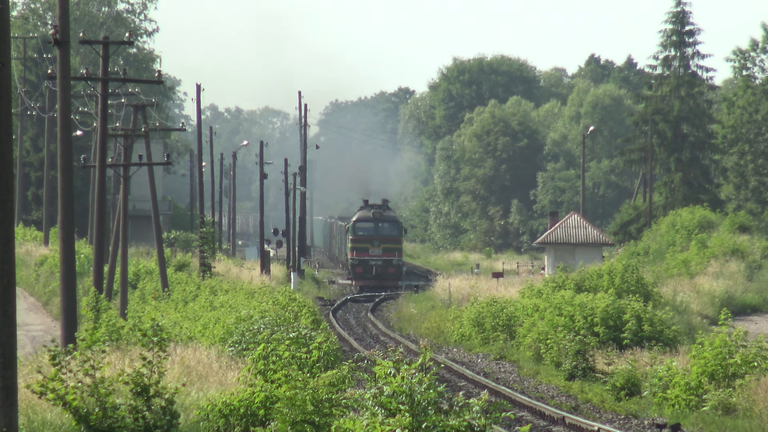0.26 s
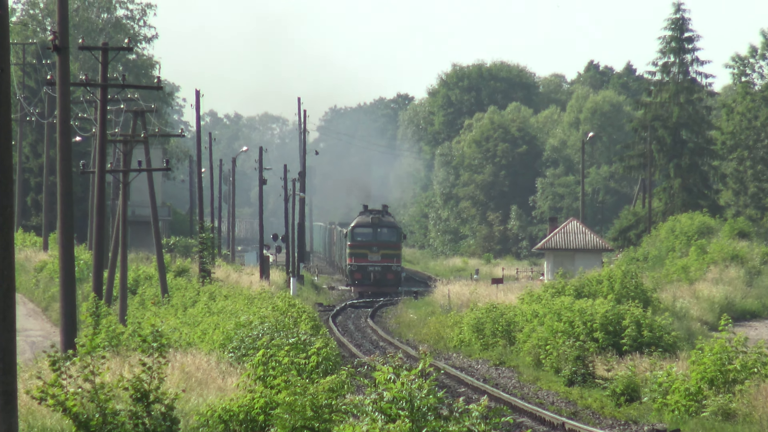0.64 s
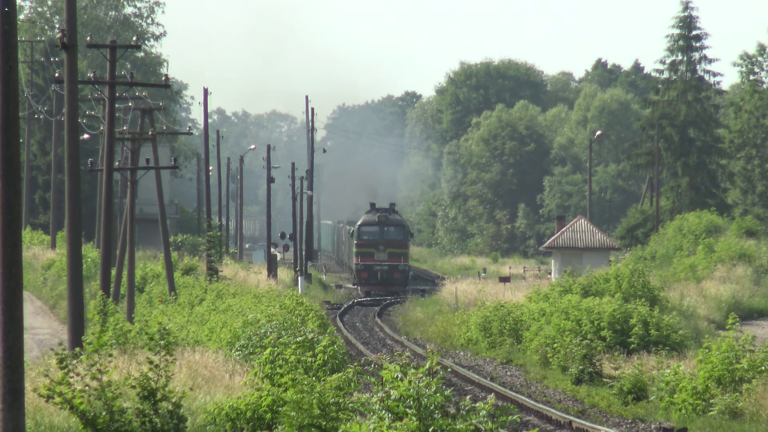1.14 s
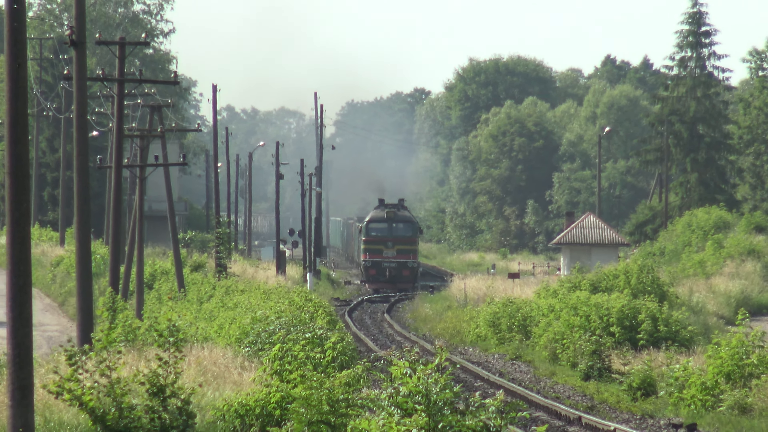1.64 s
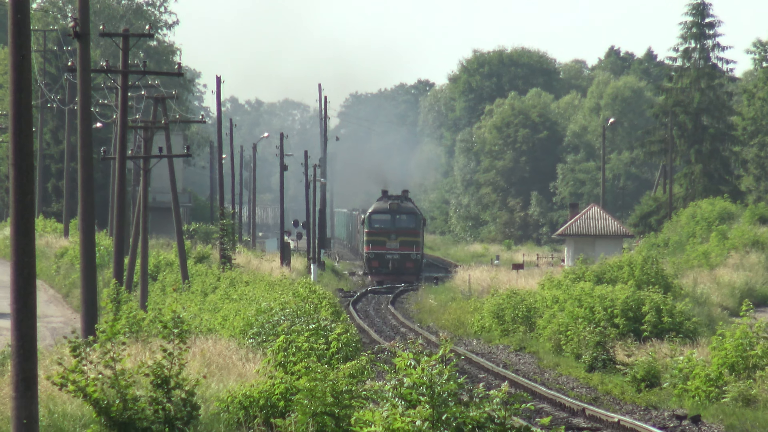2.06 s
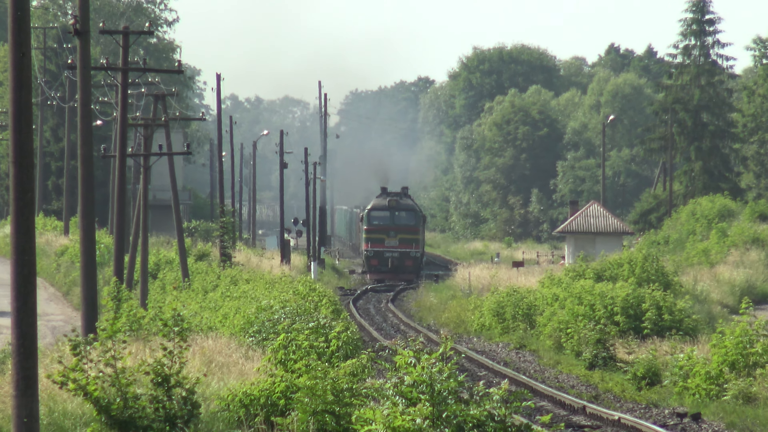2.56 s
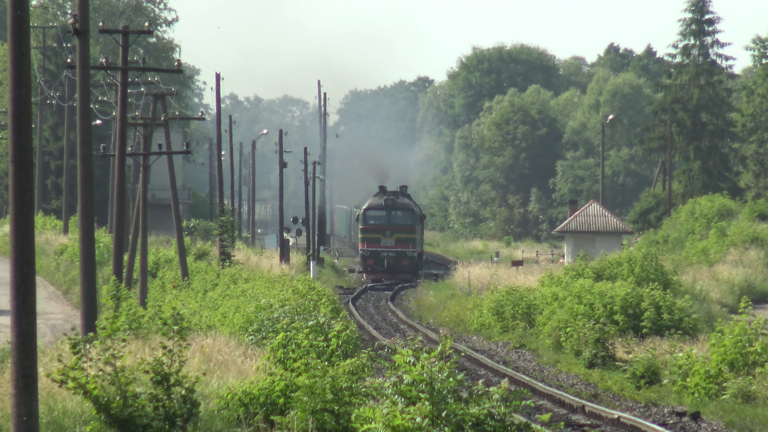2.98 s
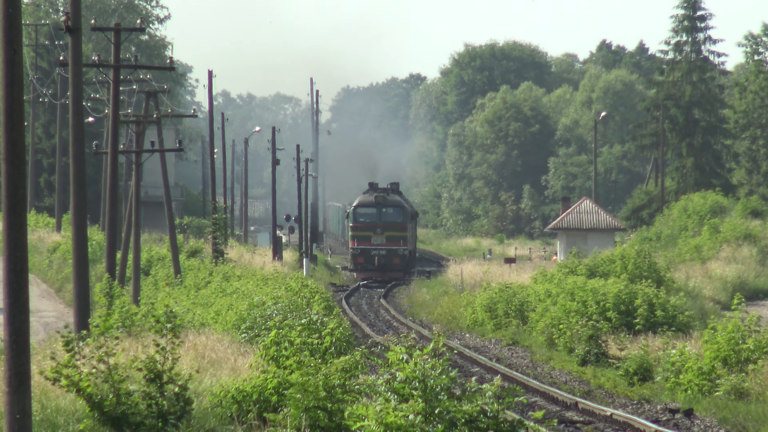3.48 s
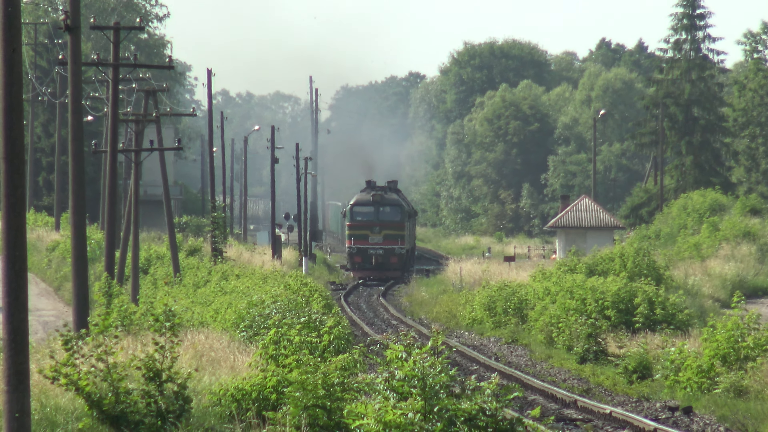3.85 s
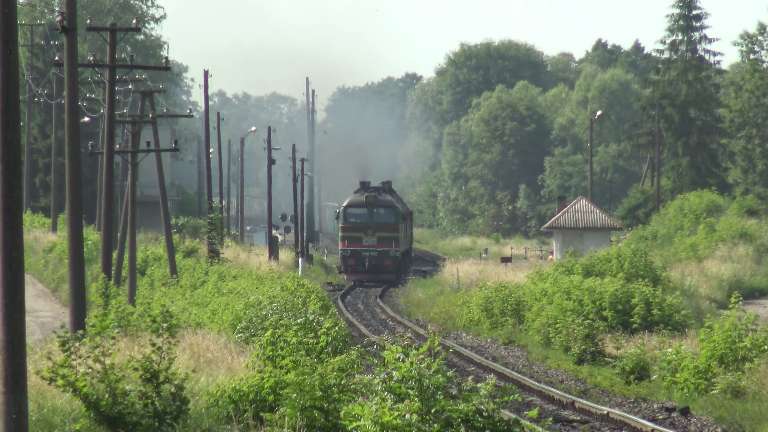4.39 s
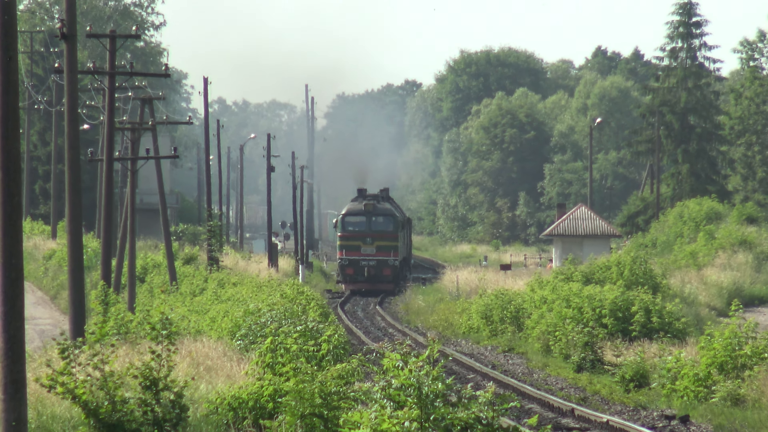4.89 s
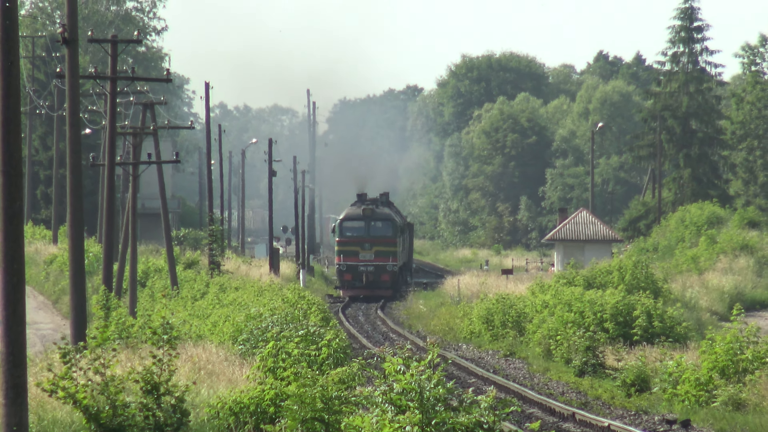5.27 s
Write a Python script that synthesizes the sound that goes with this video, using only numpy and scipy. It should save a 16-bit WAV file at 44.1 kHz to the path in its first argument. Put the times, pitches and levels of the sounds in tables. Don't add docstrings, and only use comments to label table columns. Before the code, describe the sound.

Outdoors by a wooded railway, a far-off twin diesel drones continuously, very low and uneven in strength, growing slightly fuller in the last part. Muffled exhaust roar and a thin hiss sit over it. Small birds give brief chirps and whistles, busiest near the end, leaves rustle faintly, and gusts gently rumble at the microphone.

```python
import sys
import numpy as np
from scipy import signal
from scipy.io import wavfile
from scipy.ndimage import uniform_filter1d, map_coordinates

SR = 44100
rng = np.random.default_rng(int(sys.argv[2]) if len(sys.argv) > 2 else 0)


def to_linear_factor(level_db):
    exponent = np.asarray(level_db, float) / 20
    return 10 ** exponent


def to_wav(s):
    ch = np.atleast_2d(s).T
    pcm = np.round(np.clip(ch, -1, 1) * 32767)
    wavfile.write(sys.argv[1], SR, pcm.astype(np.int16))


N = 243961
T = np.arange(N) / SR
FRONT_HZ, REAR_HZ = 10.781, 11.05
FIRINGS_PER_TURN = 6


def evened(x):
    return x / np.sqrt(np.mean(x ** 2) + 1e-20)


def curve(rows):
    s, db = np.transpose(rows)
    return np.interp(T, s, db)


def bumps(rows, width_s):
    return sum(db * np.exp(-((T - s) / width_s) ** 2) for s, db in rows)


def wander(top_hz):
    count = int(N / SR * top_hz * 2) + 4
    places = np.linspace(1, count - 2, N)
    return evened(map_coordinates(rng.standard_normal(count), [places], order=3))


def add(mix, s, sound):
    part = mix[round(s * SR):][:len(sound)]
    part += sound[:len(part)]


def noise(points, patchy_db, size):
    frames, hz = 4 * N // size + 5, np.fft.rfftfreq(size, 1 / SR)
    real, imaginary, patches = rng.standard_normal((frames, len(hz), 3)).T
    for axis in (0, 1):
        patches = uniform_filter1d(patches, size=8, axis=axis)
    patches = evened(patches)
    f, db = np.transpose(points)
    shape_db = np.interp(np.log(hz + 1), np.log(f + 1), db, left=-90, right=-90)
    z = (real + 1j * imaginary) * to_linear_factor(shape_db[:, None] + patchy_db * patches)
    sound = signal.istft(z, nperseg=size, noverlap=3 * size // 4)[1]
    return evened(sound[:N])


# (time [s], level [dB])
FRONT_FIRING = [(0.0, -14.5), (0.43, -13.0), (0.49, -6.5), (0.77, -8.5), (1.05, -7), (1.78, -12.5),
                (1.85, -7.5), (2.21, -7), (2.44, -11.5), (2.7, -11.5), (2.92, -6.5), (3.02, -9.7),
                (3.62, -9.0), (4.04, -10.6), (4.46, -7), (4.48, -8), (5.3, -8.8), (5.53, -7.5)]
# (time [s], level [dB])
HUM_EDDIES = [(.07, 4.5), (.19, -1.5), (.28, 4.5), (.98, -2), (2.47, -1), (2.56, 2), (3.04, -1.5),
              (3.13, 3.5), (3.4, -3), (3.7, 2), (4.01, -2.5), (4.73, -2), (4.85, 2.5), (5.3, -1), (5.4, 4)]


def hum():
    in_step_s = .0682
    sway = .035 * wander(2.5)
    turns = FIRINGS_PER_TURN * (T - in_step_s)
    front = np.cos(2 * np.pi * (FRONT_HZ * turns + sway))
    rear = np.cos(2 * np.pi * (REAR_HZ * turns + sway))
    both = to_linear_factor(curve(FRONT_FIRING)) * front + to_linear_factor(-23.5) * rear
    return np.sqrt(2) * to_linear_factor(bumps(HUM_EDDIES, width_s=0.026)) * both


# (time [s], level [dB])
AIR_CARRY = [
    (0, 0),
    (.9, -0.2),
    (1.9, -1),
    (2.7, 1),
    (3.6, -0.76),
    (4.3, 2.5),
    (4.85, 2),
    (5.53, 2.5),
]


def carry(share):
    return to_linear_factor(share * curve(AIR_CARRY))


def orders(crank_hz, rows, waver_db):
    out = np.zeros(N)
    for order, db in rows:
        turn = order * crank_hz * T + rng.random()
        out += to_linear_factor(db + waver_db * wander(1.5)) * np.cos(2 * np.pi * turn)
    return np.sqrt(2) * out


# (order [per crank turn], level [dB])
FRONT_ORDERS = [(4, -38.5), (5, -34.5), (7, -38.5), (8, -40), (9, -39.5), (10, -50), (12, -56), (15, -55.5),
                (16, -50.5), (17, -47.5), (18, -47), (20, -42.5), (21, -46), (22, -49), (23, -42.5),
                (24, -42.5), (25, -50.5), (26, -40.5), (27, -53.5), (28, -55), (29, -37), (30, -42.5),
                (31, -49), (32, -44), (35, -50.5), (37, -57.5), (38, -46), (42, -58), (44, -55.5),
                (47, -55.5)]
REAR_ORDERS = [(3.94, -45.5), (5.2, -47), (8.1, -46.5), (9.005, -47), (11.8, -53.5), (18.03, -47.5),
               (17.37, -53), (21.33, -57.5), (36.44, -56), (40.76, -56), (44, -55)]
# (frequency [Hz], density [dB per Hz])
BODY_SPECTRUM = [(25, -31.5), (40, -5), (55, -2.5), (63, 2), (75, -10), (100, -12.5), (150, -19),
                 (190, -10), (260, -19), (310, -14), (420, -18.5), (600, -36.5)]


def engines():
    tones = orders(FRONT_HZ, FRONT_ORDERS, waver_db=1.5) + orders(REAR_HZ, REAR_ORDERS, waver_db=3.5)
    puff = 1 + 0.19 * np.cos(2 * np.pi * FRONT_HZ * T)
    body = to_linear_factor(-31.5) * noise(BODY_SPECTRUM, patchy_db=3.8, size=8192) * puff
    return (tones + body) * carry(0.67)


def puffs():
    firing = np.cos(2 * np.pi * FIRINGS_PER_TURN * FRONT_HZ * T)
    return firing + 0.2 * np.cos(2 * np.pi * FRONT_HZ * T)


# (frequency [Hz], density [dB per Hz])
ROAR_SPECTRUM = [(300, -26), (450, -1), (700, -3), (1000, -7.5), (1320, -11), (1650, -10), (1850, -11.5),
                 (1960, -13), (2120, -12), (2480, -18), (2650, -16.5), (2850, -23), (3300, -31)]


def exhaust_roar():
    roar = to_linear_factor(-38) * noise(ROAR_SPECTRUM, patchy_db=.6, size=1024)
    return roar * carry(0.41) * (1 + .01 * puffs())


# (frequency [Hz], density [dB per Hz])
HISS_SPECTRUM = [(2300, -15.5), (3050, -1), (3600, -2), (4200, -3), (4550, -5.5), (4690, -4), (4750, -4),
                 (4800, -8), (5200, -14), (5800, -20.5), (6500, -25), (7500, -33.5)]
# (time [s], level over the hiss [dB])
LEAF_RUSTLES = [
    (1.08, 2),
    (2.6, 1.5),
    (3.25, 0.5),
    (4.82, 4),
]


def hiss():
    level = to_linear_factor(-52.5 + bumps(LEAF_RUSTLES, width_s=0.18)) * carry(0.59)
    return level * noise(HISS_SPECTRUM, patchy_db=1.13, size=1024) * (1 + 0.09 * puffs())


# (frequency [Hz], density [dB per Hz])
RUMBLE_SPECTRUM = [(5, -32), (10, -6), (14, 6.5), (22, -16.5), (35, -13.5), (45, -37.5)]


def air_rumble():
    gusts_db = -27.5 + 3.5 * wander(3.0)
    return to_linear_factor(gusts_db) * noise(RUMBLE_SPECTRUM, patchy_db=0.3, size=16384)


# (time [s], length [s], pitch [Hz], glide [Hz], level [dB])
WHISTLE_NOTES = [(0.015, .033, 3000, -20, -55), (.42, .03, 3150, -300, -53),
                 (0.851, .135, 3050, -59.5, -56), (1.165, 0.026, 3340, 200, -50.5),
                 (4.847, 0.019, 3080, -400, -56), (4.873, .03, 2990, -400, -58),
                 (4.9, 0.068, 3140, 125, -56), (4.955, .05, 3150, -220, -51),
                 (4.996, 0.082, 2720, 104, -53), (5.066, .055, 3400, -370, -53.5),
                 (5.28, .03, 2940, 63.5, -54), (5.468, .025, 2730, 380, -53),
                 (5.488, 0.041, 3120, -370, -51)]


def whistles():
    return [(s, length, hz, hz + glide, db, 35) for s, length, hz, glide, db in WHISTLE_NOTES]


# (time [s], length [s], pitch [Hz], glide [Hz], level [dB])
CHIRP_NOTES = [(.07, .05, 4090, -1, -66), (.37, 0.034, 3870, 83, -55), (.715, 0.032, 3900, -49, -54),
               (.775, 0.021, 4620, -320, -53.5), (.782, .041, 3840, 452, -55),
               (1.085, 0.052, 4130, 105, -51.5), (1.115, 0.022, 4700, -1000, -55),
               (1.70, 0.036, 3900, -31.5, -58), (2.465, 0.036, 4390, -85, -49.5),
               (2.803, .04, 4100, 101, -60), (1.17, .02, 3500, 902, -55.5), (3.36, .036, 3990, 61, -56)]


def chirps():
    return [(s, length, hz, hz + glide, db, 70) for s, length, hz, glide, db in CHIRP_NOTES]


# (time [s], pitch [Hz], level [dB])
CHIP_NOTES = [(.225, 4500, -56), (.70, 4720, -58), (2.055, 5250, -65), (2.18, 5200, -61),
              (2.40, 4000, -53.5), (3.16, 5400, -64), (3.185, 3950, -55), (3.285, 5500, -63.5),
              (3.29, 6600, -74), (4.165, 5550, -67), (4.38, 4520, -55), (4.585, 4600, -59),
              (4.80, 4200, -57), (4.82, 3700, -59), (4.72, 3400, -60)]


def chips():
    return [(s, .03, hz, hz * (1 - .06), db, 260) for s, hz, db in CHIP_NOTES]


# (time [s], length [s], pitch [Hz], level [dB])
SEEP_NOTES = [
    (1.553, .07, 7400, -76),
    (3.50, .14, 7300, -79),
    (3.56, .09, 7670, -75.5),
    (5.13, .1, 7450, -73),
    (5.19, .12, 7150, -75.5),
    (5.19, .05, 7700, -76),
]


def seeps():
    return [(s, length, hz, hz, db, 180) for s, length, hz, db in SEEP_NOTES]


def twitter(count):
    s, pitch, glide, size = rng.random((count, 4)).T
    start_s, length = s * (N / SR - .05), .015 + .025 * size
    hz = 2700 * 2 ** (.8 * pitch)
    end_hz = hz * (.92 + .14 * glide)
    return np.c_[start_s, length, hz, end_hz, -59 - 11 * pitch, np.full(count, 20)]


def birds():
    out = np.zeros(N)
    shake = wander(450)
    notes = [*whistles(), *chirps(), *chips(), *seeps(), *twitter(count=70)]
    for s, length, start_hz, end_hz, db, trill_hz in notes:
        count = int(length * SR)
        hz = np.linspace(start_hz, end_hz, count) + trill_hz * shake[int(s * SR):][:count]
        note = np.sin(2 * np.pi * np.cumsum(hz) / SR) * signal.windows.tukey(count, .6)
        add(out, s, to_linear_factor(db + 6.0) * note)
    echoes = evened(rng.standard_normal(4000)) * to_linear_factor(-60 * T[:4000] / 0.17)
    echoes = echoes / np.linalg.norm(echoes)
    return out + to_linear_factor(-12) * signal.oaconvolve(out, echoes)[:N]


# (time [s], peak level [dB])
NEAR_TICKS = [
    (.1048, -42),
    (.389, -50),
    (.452, -47),
    (.4533, -45),
    (.4543, -47),
    (.4552, -48),
]


def ticks():
    out, t = np.zeros(N), T[:20]
    for s, db in NEAR_TICKS:
        add(out, s, to_linear_factor(db) * np.sin(2 * np.pi * 13000 * t) * np.hanning(len(t)))
    return out


def scene():
    locomotive = hum() + engines() + exhaust_roar() + hiss()
    return (locomotive + air_rumble() + birds() + ticks())[None]


def roll_off(x):
    return signal.sosfilt(signal.butter(12, 15780, fs=SR, output="sos"), x)


# (frequency [Hz], level [dB])
RECORDER_WHINE = [(6934, -89.5), (8667, -92.5), (10401, -90.5), (12134, -91), (13867, -91), (15601, -90)]


def record(dry):
    self_noise = to_linear_factor(-63.0) * rng.standard_normal(N)
    whine = sum(np.sqrt(2) * to_linear_factor(db) * np.sin(2 * np.pi * hz * T) for hz, db in RECORDER_WHINE)
    return roll_off(dry + self_noise + whine)


dry = scene()
out = record(dry)
to_wav(out)
```